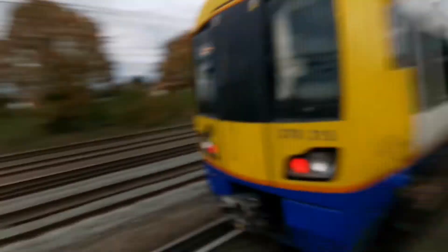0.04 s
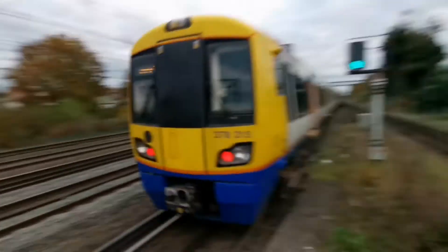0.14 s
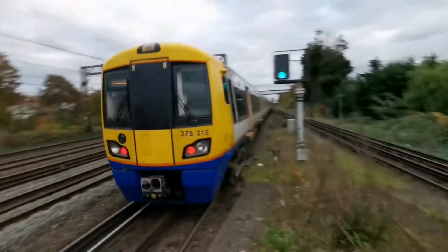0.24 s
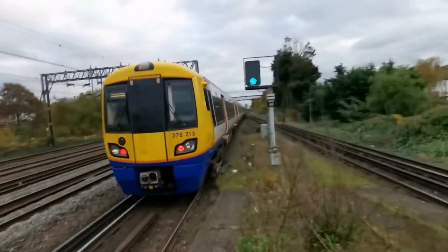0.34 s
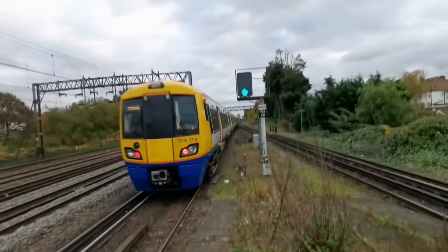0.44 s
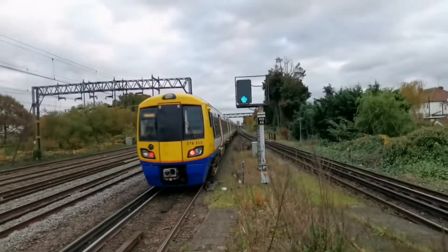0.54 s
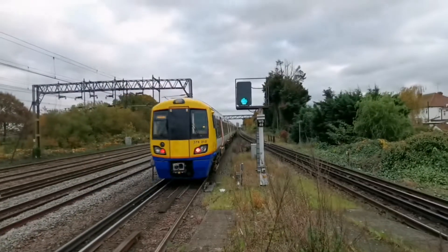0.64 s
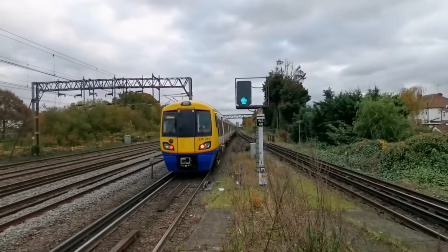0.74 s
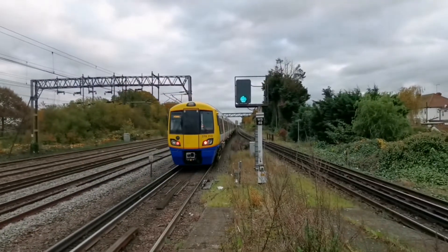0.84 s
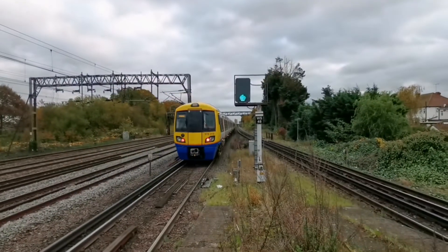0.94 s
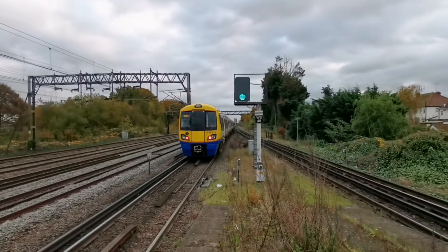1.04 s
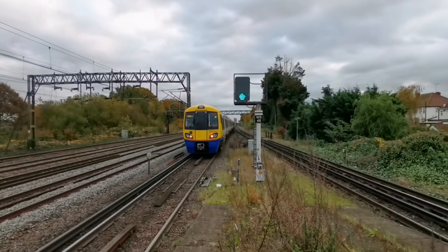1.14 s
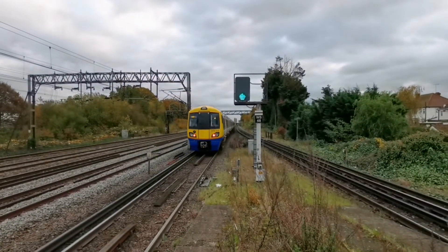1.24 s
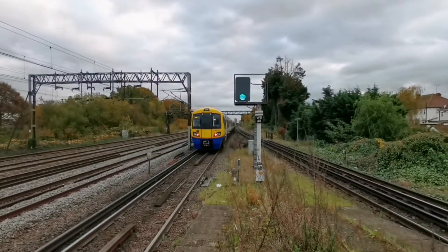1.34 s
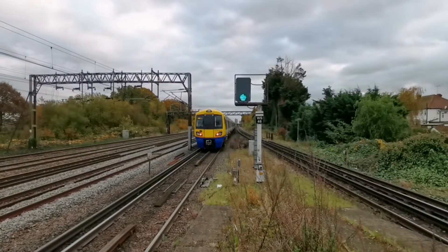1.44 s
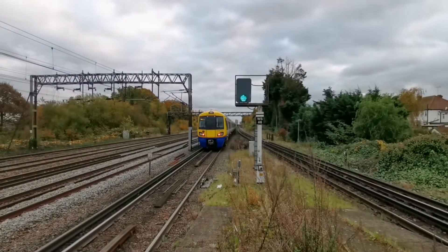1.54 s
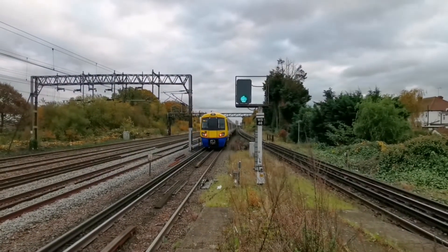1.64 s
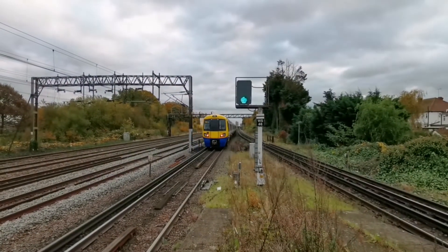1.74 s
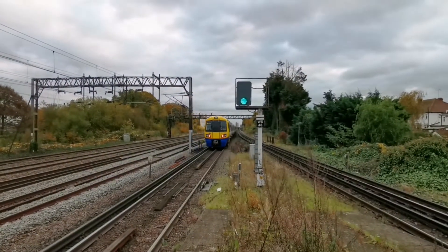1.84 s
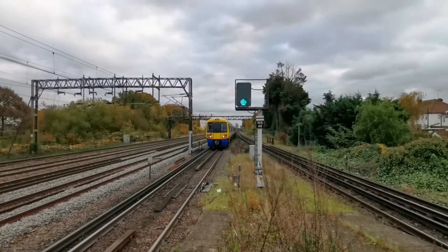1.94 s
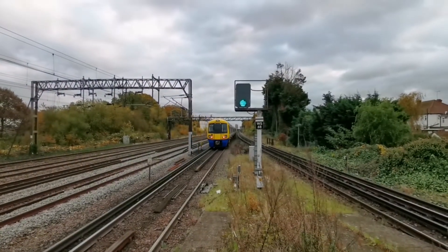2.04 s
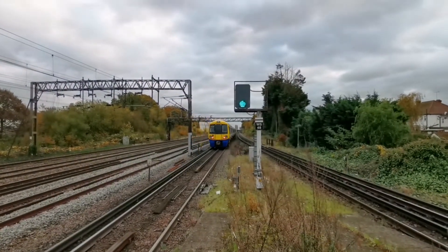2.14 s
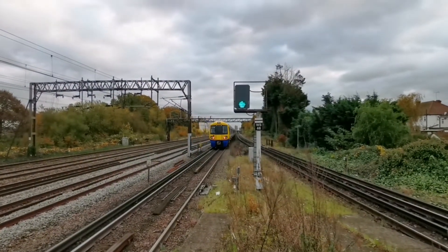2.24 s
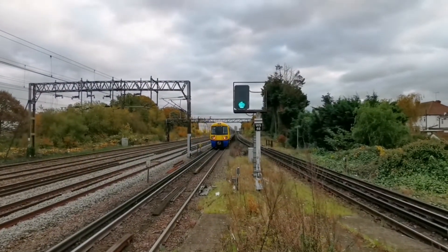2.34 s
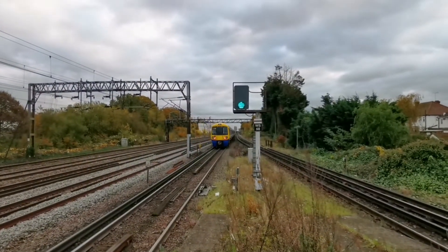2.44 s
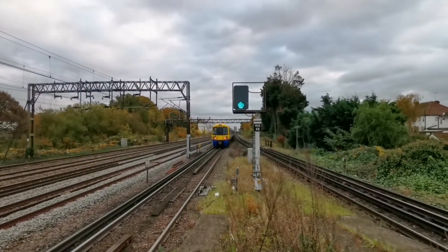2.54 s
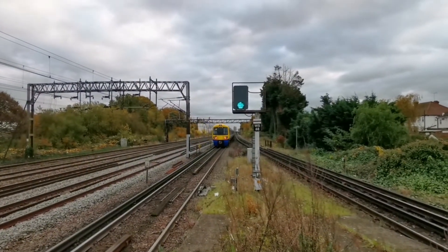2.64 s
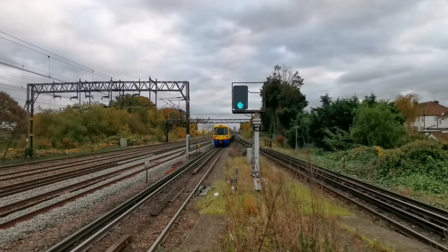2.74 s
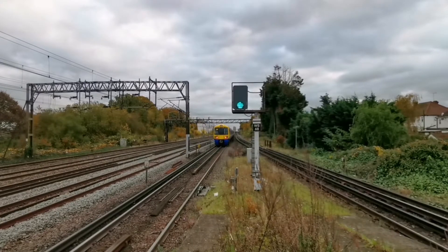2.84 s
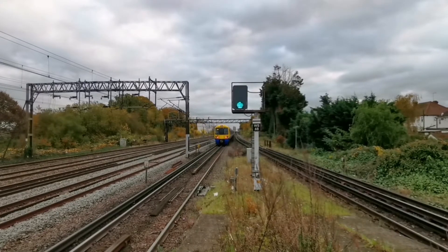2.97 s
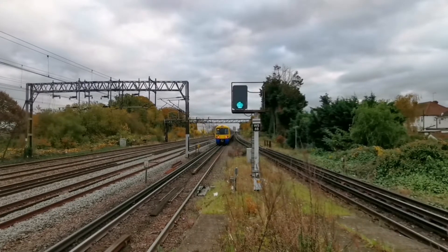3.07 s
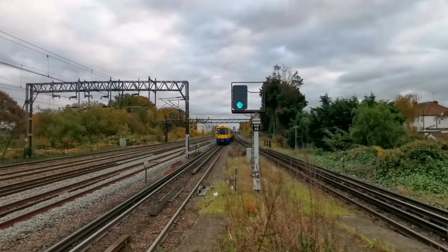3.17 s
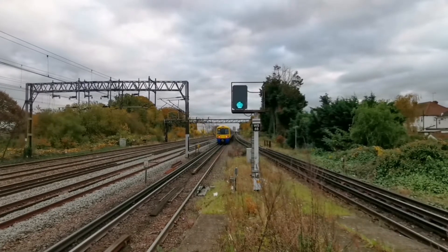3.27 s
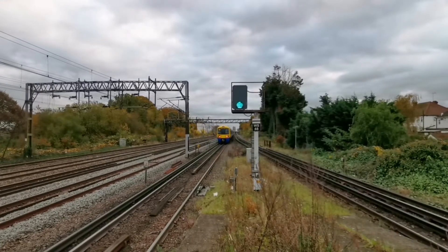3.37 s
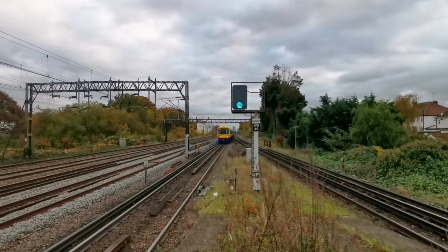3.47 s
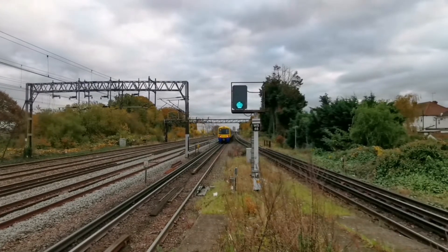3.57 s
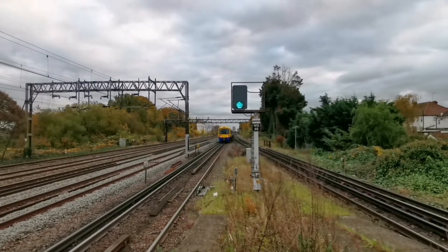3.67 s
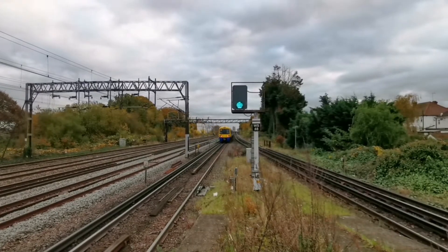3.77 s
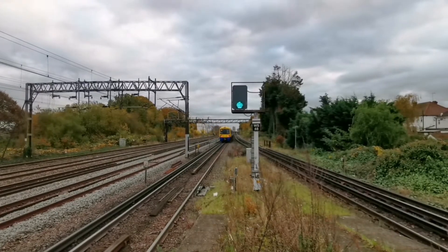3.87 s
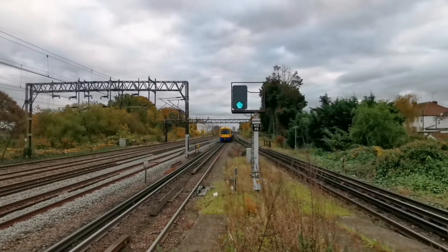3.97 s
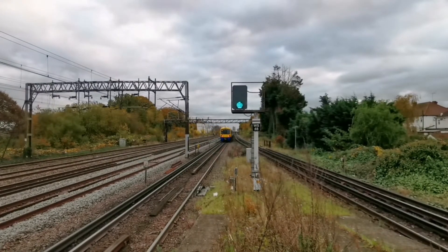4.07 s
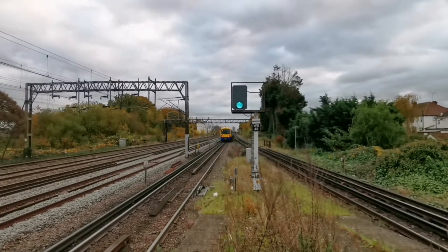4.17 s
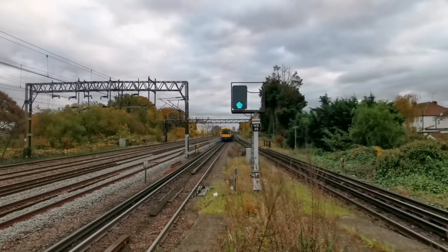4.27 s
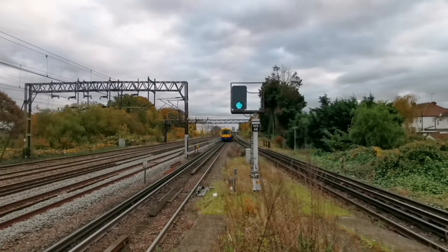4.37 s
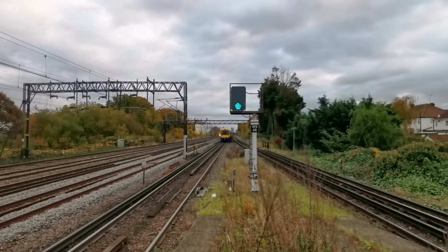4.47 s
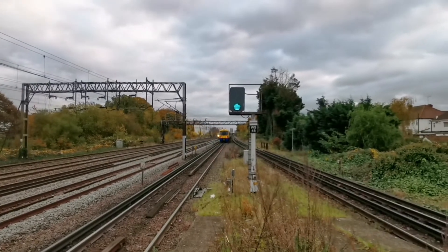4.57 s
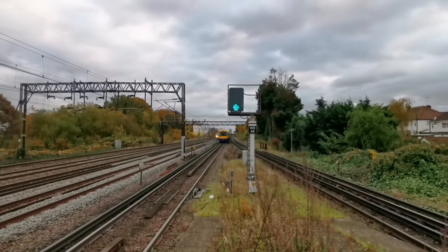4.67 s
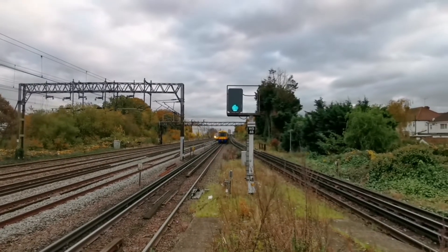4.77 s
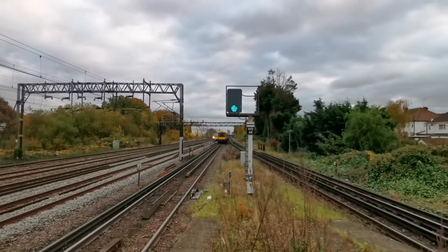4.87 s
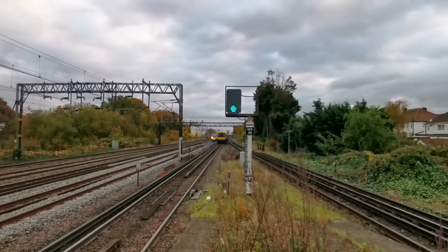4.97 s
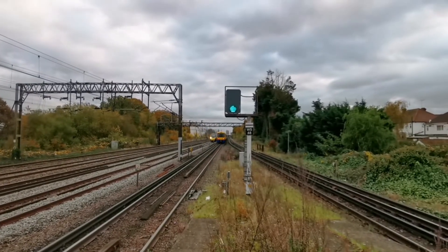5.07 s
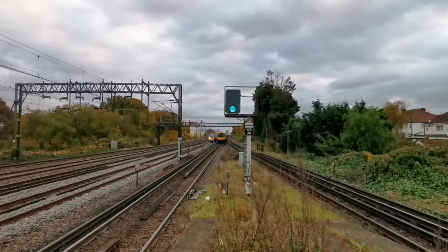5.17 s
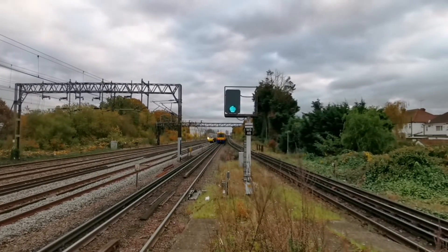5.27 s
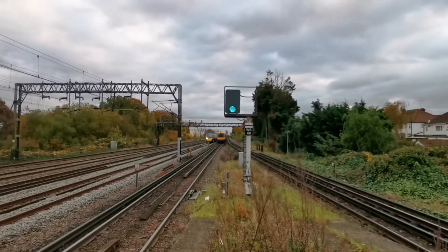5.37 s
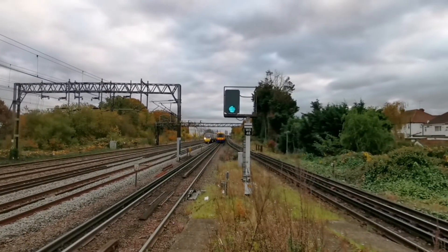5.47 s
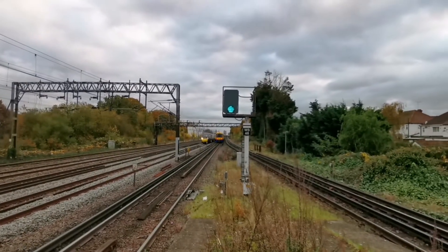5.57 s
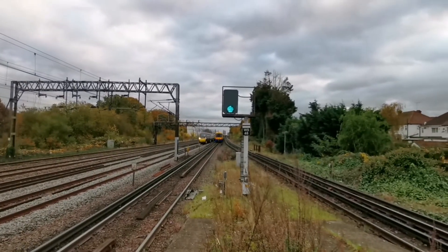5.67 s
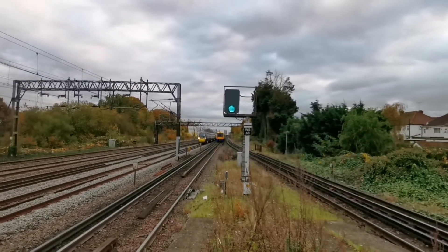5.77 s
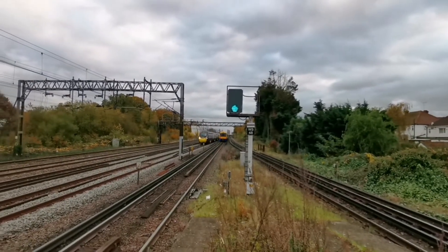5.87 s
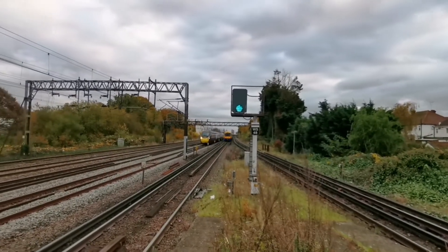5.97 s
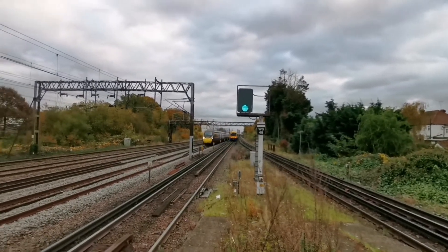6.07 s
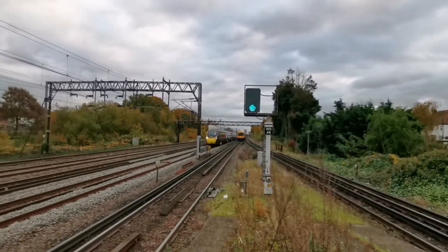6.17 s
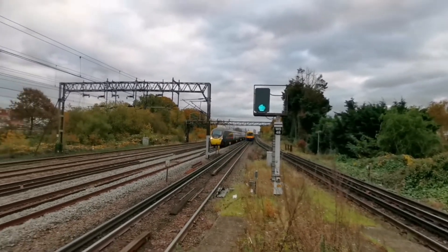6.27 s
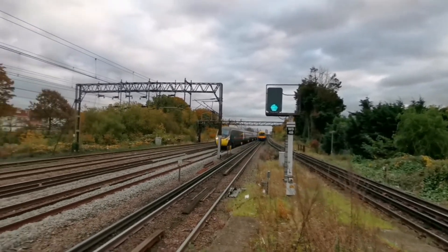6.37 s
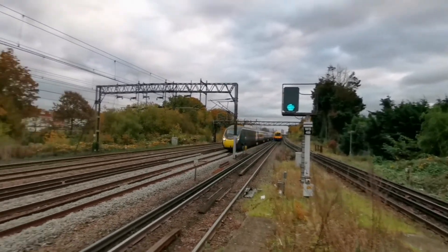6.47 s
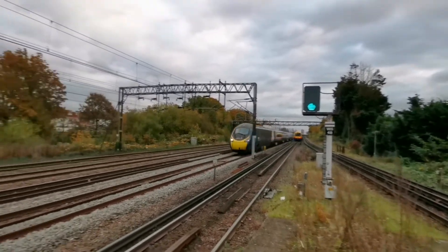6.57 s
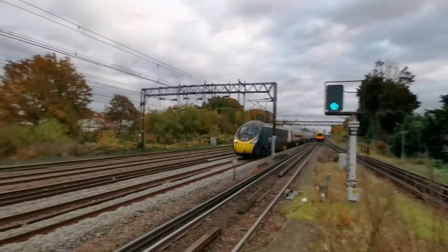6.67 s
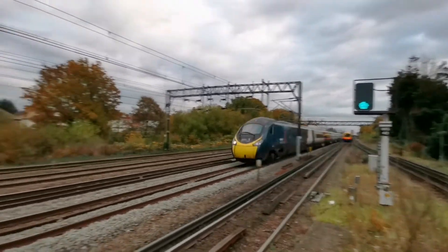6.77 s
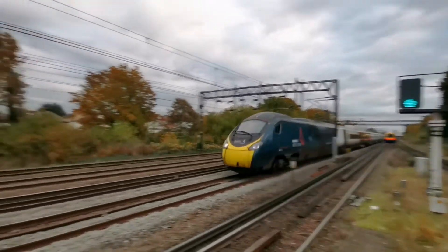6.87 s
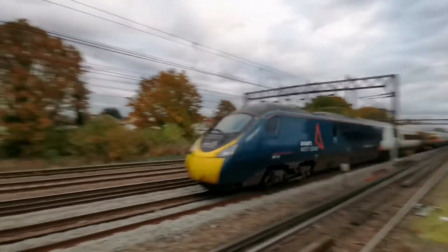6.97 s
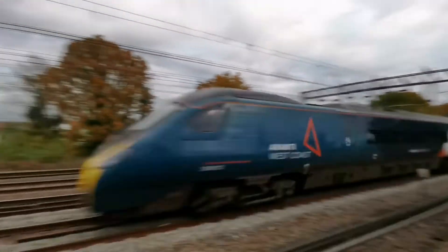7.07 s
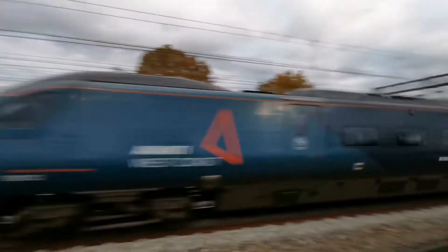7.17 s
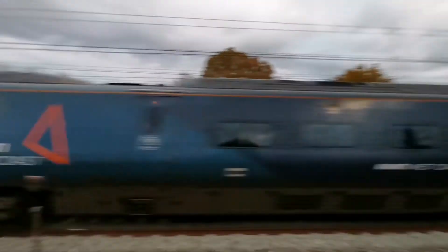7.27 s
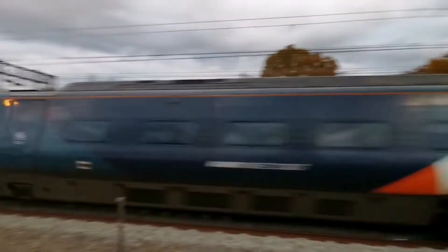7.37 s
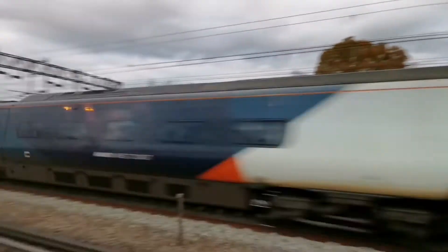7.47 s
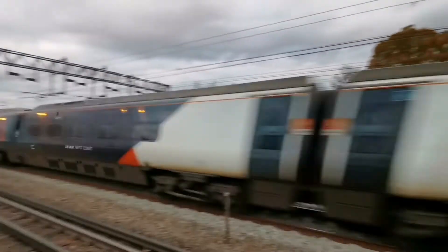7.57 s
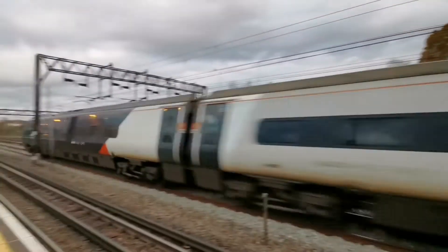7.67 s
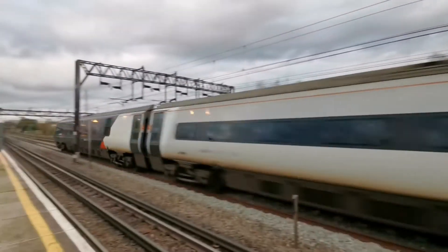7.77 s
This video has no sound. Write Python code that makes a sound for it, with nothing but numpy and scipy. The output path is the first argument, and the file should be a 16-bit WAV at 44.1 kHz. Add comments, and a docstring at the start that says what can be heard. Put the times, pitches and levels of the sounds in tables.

```python
"""First one hears the roar and rumble of a stopping train leaving a platform end, in wind that buffets two
microphones; low thumps, scrapes and wheels clanking over distant rail joints are heard along with it. A fast
train comes up on the far track: the rails hiss, then rumble, rolling roar and gear whines swell, the whines
sliding down as each bogie passes. Roar, wind and hiss are filtered random spectra; whines are tones in narrow
noise; thumps are short low oscillations; joint blows are noise shaped by wheel modes or a broad spectrum."""
import sys
import numpy as np
from scipy import signal
from scipy.fft import rfft, irfft
from scipy.io import wavfile
from scipy.ndimage import uniform_filter1d

SR = 44100
rng = np.random.default_rng(int(sys.argv[2]) if len(sys.argv) > 2 else 0)


def output_pcm(signal):
    """Save a mono or channel-first signal as 16-bit PCM at the path in sys.argv[1].

    Samples are clipped to [-1, 1] before scaling.
    """
    pcm = np.clip(np.atleast_2d(signal).T, -1, 1) * 32767
    wavfile.write(sys.argv[1], SR, np.round(pcm).astype(np.int16))


N = 344862  # samples
HOP = 256  # samples between spectral frames
HZ = np.fft.rfftfreq(4 * HOP, 1 / SR)[:, None]  # bin frequencies
T = np.arange(N // HOP + 5) * HOP / SR  # frame times in s

# Level difference of the microphones, source ahead or abreast: (f/Hz, left-right level/dB)
AHEAD = [(60, -0.5), (99, -0.5), (160, -0.5), (270, -1.5), (450, -5.5), (740, -3.5), (1220, -6.5),
         (2010, -10.0), (3330, -13.0), (5500, -11.0), (9080, -1.5), (15000, -7.0)]
ABREAST = [(60, 0.0), (99, -0.5), (160, 0.0), (270, 0.0), (450, -2.0), (740, -2.5), (1220, -1.5),
           (2010, -4.0), (3330, -7.0), (5500, -5.5), (9080, 7.5), (15000, -2.5)]
# Correlation of the microphones, near and far track: (f/Hz, left-right likeness from -1 to 1)
SAME_NEAR = [(60, .95), (340, .93), (690, .75), (1030, .45), (1500, 0), (2000, .1), (2600, .55),
             (3200, -.15), (4000, .15), (5500, 0)]
SAME_FAR = [(60, .92), (330, .86), (520, .75), (860, .68), (1200, .05), (1550, -.45), (1900, -.15),
            (2400, .45), (2900, .1), (3300, -.35), (4000, .35), (5200, -.15), (7000, .05)]

# Leaving train, relative spectra of the roar nearby and far off, and of the rumble: (f/Hz, level/dB per Hz)
LEAVING_NEAR = [(150, -43), (250, -8.5), (312, 1.5), (360, -7.5), (442, -4), (769, -12.5), (1140, -9.5),
                (1470, -15), (2020, -5.5), (2370, -9.5), (2910, -8.5), (3410, -17.5), (4750, -16),
                (7760, -34), (11000, -36.5), (14300, -64), (22000, -120)]
LEAVING_FAR = [(210, -0.5), (350, -3), (474, -13.5), (540, -4.5), (752, -1.5), (1460, -11.5), (1950, -6.5),
               (2830, -4.5), (3320, -15.5), (4630, -19), (6360, -36), (6930, -31.5), (7450, -41),
               (10200, -37), (11000, -41), (14300, -78), (22000, -120)]
LEAVING_LOW = [(12, -45), (20, -1), (48, -3.5), (92, 0), (172, -2.5), (241, -13.5), (312, -17),
               (600, -27.5), (780, -64), (1320, -120)]
# Brief swells of its roar: (peak t/s, added level/dB, 1/e half-length/s)
SWELLS = [(.6, 2, .3), (1.75, 3, 0.25), (3.058, 2.5, .35), (3.987, 3.5, 0.081), (4.5, 3.5, 0.35)]
# Roar level once risen, before spreading; time in which distance doubles; loss per doubling
ROAR_DB, DOUBLE_S, SPREAD_DB = -28, 0.34, 5
ONSET_DB, ONSET_S = 8.5, 0.068  # how much weaker the roar starts; time constant of its quick rise
RUMBLE_DB, RUMBLE_HOLD_S, RUMBLE_FADE_DB_PER_S = -33, 0.72, 12

# Relative spectrum of wind turbulence before brightening: (f/Hz, level/dB per Hz)
WIND_COLOUR = [(8.8, -33), (15, -7), (54, 8.5), (141, -3.5), (194, -5.5), (499, -27), (547, -29),
               (600, -23.5), (780, -35), (1320, -120)]
# Gusts: (peak t/s, level/dB, 1/e half-length/s, left-right level/dB before widening,
# treble slope/dB per octave before the common slope is added)
GUSTS = [(2.04, -36.5, .05, 0, 8), (2.13, -34, 0.036, -12, -20), (2.2, -34, .05, -2, 0),
         (2.27, -35, 0.043, -11, -20), (2.41, -35, 0.06, 0, -15), (2.557, -31, 0.065, -15, -15),
         (2.746, -32, 0.17, -3, -12), (2.98, -40, 0.14, -3, -14), (3.202, -31, 0.053, -7, -2),
         (3.308, -32.5, .05, -4, -14), (3.4, -26, 0.054, -9, -7), (3.46, -28, .04, 2, -17),
         (3.516, -28, .025, -12, -2.5), (3.62, -33.5, 0.12, -5, -11.5), (3.81, -30, 0.15, 8.5, -15),
         (4.04, -35, 0.088, 11, -12), (4.22, -34, 0.13, -0.5, -8), (4.554, -39, 0.069, -3, -22),
         (4.695, -34.5, 0.039, 9, -18), (5.43, -38, 0.044, -12, -11.5)]
BREEZE_DB = -58.5  # steady wind under the gusts

# Rail hiss, faint after the first train, then ahead of the fast one: (t/s, level/dB)
RAILS = [(0.0, -54), (0.25, -57), (0.63, -64), (3.63, -66.5), (5.75, -55), (6.45, -43), (6.8, -36),
         (7.0, -40.5), (7.82, -42)]
# Its relative spectrum: (f/Hz, level/dB per Hz)
RAIL_HISS = [(5290, -57), (9000, -13), (9640, -3), (10900, -20), (11100, 11.5), (11700, 3), (12900, 10),
             (14300, 1.5), (15600, 9)]
# Thin tones in the rails: (f/Hz, pole width/Hz, level/dB against the capped hiss level)
RAIL_TONES = [(11700, 40, -13.5), (12650, 60, -15)]

# Single low thumps: (t/s, level/dB, f/Hz, left-right level/dB)
THUMPS = [(0.099, -19.5, 77, -3), (0.431, -9, 176, -2.5), (0.592, -20.5, 182, -3.0),
          (0.649, -21.5, 158, -2), (0.828, -23, 120, -3.5), (1.203, -28, 112, -2.0), (1.567, -28, 197, -1),
          (1.979, -27.5, 172, 0), (2.023, -25, 200, -1.5), (2.17, -21.5, 181, 1), (2.04, -27, 310, -1),
          (2.206, -24, 124, 2), (2.218, -24, 330, -1), (2.793, -24, 194, 1.5), (2.965, -29.5, 197, -2.0),
          (3.185, -24.5, 163, -11.0), (3.388, -23, 148, -15), (3.508, -22.5, 131, -19),
          (4.291, -19, 170, -0.5)]
# Short scrapes: (start t/s, end t/s, level/dB, resonance f/Hz, pole width/Hz)
SCRAPES = [(3.915, 4.05, -49.5, 4640, 720), (3.76, 3.9, -48.5, 2870, 300), (3.92, 4.04, -40.5, 2740, 400),
           (4.595, 4.63, -52, 3900, 600), (.17, .25, -49, 12000, 1500), (.17, .24, -46, 9200, 1000),
           (.17, 0.254, -32, 2950, 350), (.12, .4, -38.5, 1170, 230), (.12, .18, -36, 2100, 150),
           (6.885, 6.91, -38, 5300, 800)]

# Wheels ringing at a joint: (t/s, level/dB, decay by 60 dB/s)
CLINKS = [(1.967, -39, 0.076), (2.151, -26.5, 0.03), (3.241, -42, 0.07), (4.01, -36, 0.045),
          (4.177, -25, 0.035)]
# Wheel modes: (f/Hz, pole width/Hz, level/dB)
WHEEL_MODES = [(1076, 176, 7.5), (1750, 260, 0.5), (2160, 300, -13), (2730, 150, -17)]
# Wheels dropping at a joint: (t/s, level/dB, decay by 60 dB/s, treble slope/dB per octave above 700 Hz)
CLUNKS = [(0.833, -25, 0.036, 1), (2.03, -22.5, 0.038, -1), (2.208, -17, 0.049, -1),
          (2.966, -30, 0.037, 3.5), (4.133, -27, 0.14, -0.5), (4.305, -11, 0.043, -1)]
# Relative spectrum of a drop: (f/Hz, level/dB per Hz)
CLUNK_COLOUR = [(88, -35), (150, 0), (330, -1), (509, -10.5), (838, 5), (1020, -7.5), (2100, -8),
                (2460, -21), (2710, -15), (4050, -21.5), (7000, -43), (9100, -83), (15400, -120)]

# Motor and gear tones: (head-on f/Hz, passing t/s, pole width/Hz, half the pitch fall as share of f,
# level/dB, time held before passing/s, rise/dB per s, fade/dB per s, tone amplitude against noise of rms 1)
WHINES = [(764, 7.31, 25, .053, -27, .44, 93, 17, 0.77), (821, 7.26, 40, .03, -28, .1, 80, 88, .4),
          (759.6, 6.15, 38, .001, -37.5, .15, 15, 60, 0.37),
          (99.9, 6.1, 25, .001, -32.5, .15, 90, 60, 0.64), (1507, 7.3, 19.5, 0.011, -28.5, 0.68, 93, 92, 1),
          (2290, 7.25, 28, .015, -28, .5, 40.5, 152, 0.79), (1855, 7.2, 26, .02, -29, .01, 19, 64, .3),
          (3360, 7.12, 87, .01, -31.5, 0.085, 60, 90, .3), (850.5, 7.2, 24, .03, -31.5, .3, 27, 68, .5),
          (2301, 7.33, 61, .075, -22.5, .01, 148.5, 34, .3), (2510, 7.66, 73, .11, -21, .01, 27, 32, 0.33),
          (2384, 7.66, 71, .03, -26, .01, 29, 30.5, .3), (2805, 7.8, 67, 0.018, -24.5, .01, 25, 30, 0.26),
          (190.4, 7.28, 31, .03, -24, .01, 60.5, 84, 0.26),
          (3145, 7.23, 110, 0.0305, -23, .01, 202.5, 170, .3),
          (3990, 7.21, 90, .03, -27.5, 0.0085, 200.5, 152, 0.33),
          (4265, 7.3, 90, .03, -30.5, 0.0096, 198.5, 200, .3),
          (2490, 7.2, 36, 0.016, -34.5, .01, 17, 60, .3), (4210, 7.57, 100, .02, -31.5, .01, 150.5, 60, .3)]
# Surges of the leading car's low drone: (t/s, level/dB)
SURGES = [(5.1, -35), (5.28, -29.5), (5.42, -29), (5.68, -29), (6.03, -27), (6.3, -25), (6.45, -25.5),
          (6.86, -18.5), (7.03, -20)]
DRONE_HZ, DRONE_WIDTH_HZ = 64, 29
SURGE_RISE_DB_PER_S, SURGE_FADE_DB_PER_S = 218, 76

# Fast train: (t/s, rolling level/dB, rumble level/dB)
FAST = [(4.4, -57, -41.5), (5.03, -46.5, -40.5), (5.65, -38.5, -39.5), (6.0, -33.5, -31.5),
        (6.62, -27, -28.5), (7.1, -18.5, -22.5), (7.31, -18.5, -22), (7.64, -18, -26), (7.82, -20.5, -29.5)]
# Relative spectra of its roar, ahead and abreast: (f/Hz, level/dB per Hz)
FAST_AHEAD = [(210, -34), (350, -17.5), (481, -16.5), (763, -3.5), (1300, -11.5), (1460, -4.5), (1690, -9),
              (2320, -1.5), (2680, -6.5), (3730, -15.5), (4180, -16), (6180, -33), (6640, -30), (7780, -38),
              (11000, -29), (14300, -66), (22000, -120)]
FAST_ABREAST = [(210, -48), (350, -9), (532, -17), (614, -13.5), (680, -3.5), (933, -10), (1230, -16),
                (1760, -7.5), (1920, -7.5), (2320, 4), (2640, -3), (3780, -15.5), (4120, -14), (5350, -22),
                (11000, -30.5), (14300, -37.5), (22000, -120)]
# Relative spectra of its rumble, far and near: (f/Hz, level/dB per Hz)
FAST_LOW_FAR = [(12, -42), (20, 6.5), (65, -2), (109, -17), (147, -20.5), (273, -26.5), (304, -23.5),
                (414, -60), (500, -59), (650, -60), (1100, -120)]
FAST_LOW_NEAR = [(12, -33), (20, 1), (71, 5), (120, -8), (145, -11.5), (185, -5), (229, -10.5), (312, -8),
                 (400, -15.5), (500, -25), (650, -39), (1100, -120)]

EDGE_HZ = 15760  # upper band limit


def gain_of(db):
    """Level and amplitude: 20 dB is a factor of ten."""
    return 10 ** (np.asarray(db) / 20)


def evened(x):
    """Normalisation: the mean power becomes 1."""
    return x / np.sqrt(np.mean(x ** 2) + 1e-20)


def read(points, hz=HZ):
    """Interpolation of a spectrum along a logarithmic frequency axis."""
    f, value = np.transpose(points)
    return np.interp(np.log(hz + 1), np.log(f + 1), value)


def blend(start, end, share):
    """Linear mixing of two spectra in dB, from start (share 0) to end (share 1)."""
    share = np.clip(share, 0, 1)
    return read(start) * (1 - share) + read(end) * share


def bumps(s, length):
    """Gaussian envelopes at frame times, one row each."""
    return np.exp(-((T - s[:, None]) / length[:, None]) ** 2)


def noise(colour_db, level_db, pan_db, same, patchy_db, flicker_db):
    """Partial coherence: two random spectra share a part; level_db sets their mid before fluctuation."""
    a, b, c, d, patches = rng.standard_normal((len(T), len(HZ), 5)).T
    patches = uniform_filter1d(patches, size=9, axis=0)
    patches = evened(uniform_filter1d(patches, size=12, axis=1))
    flicker = evened(uniform_filter1d(rng.standard_normal(len(T)), size=6))
    shape = gain_of(colour_db) * np.ones(len(T))
    shape = shape / np.sqrt((shape ** 2).mean(0))
    left, right = gain_of(pan_db / 2), gain_of(-pan_db / 2)
    same = np.clip(same, -1, 1)
    mid = np.sqrt(left ** 2 + right ** 2 + 2 * same * left * right) / 2
    first, second = a + 1j * b, c + 1j * d
    z = np.array([left * first, right * (same * first + np.sqrt(1 - same ** 2) * second)])
    z *= shape / mid * gain_of(level_db + patchy_db * patches + flicker_db * flicker)
    return signal.istft(z, nperseg=4 * HOP, noverlap=3 * HOP)[1][:, :N] / np.sqrt(HOP)


def resonate(x, hz, width):
    """Heterodyne filtering: shift hz to zero, smooth with two poles, shift back."""
    turn = np.exp(2j * np.pi * np.cumsum(hz * np.ones(len(x))) / SR)
    pole = np.exp(-np.pi * width / SR)
    smooth = signal.lfilter([1], np.poly([pole, pole]), x / turn)
    return evened((turn * smooth).real)


def ports(x, hz):
    """Level difference between two microphones that receive one source ahead at pitch hz."""
    pan_db = read(AHEAD, hz)
    return gain_of(pan_db / 2) * x, gain_of(-pan_db / 2) * x


def place(mix, s, left, right):
    """Superposition: a stereo sound is added to mix from s seconds on."""
    out, at = np.zeros((2, N)), max(round(s * SR), 0)
    out[:, at:at + len(left)] = np.array([left, right])[:, :N - at]
    return mix + out


def leaving():
    """Spreading loss: after a quick rise the stopping train's roar weakens and dulls; its rumble dies faster."""
    colour_db = blend(LEAVING_NEAR, LEAVING_FAR, 1 - np.exp(-(T / 1.27) ** 2))
    s, swell_db, length = np.transpose(SWELLS)
    level_db = ROAR_DB - SPREAD_DB * np.log2(1 + T / DOUBLE_S)
    level_db = level_db - ONSET_DB * np.exp(-T / ONSET_S) + swell_db @ bumps(s, length)
    roar = noise(colour_db, level_db, read(AHEAD) - 1.2, read(SAME_NEAR), patchy_db=1.15, flicker_db=0.73)
    rumble_db = RUMBLE_DB - RUMBLE_FADE_DB_PER_S * np.maximum(T - RUMBLE_HOLD_S, 0)
    return roar + noise(read(LEAVING_LOW), rumble_db, -2.2, 0.96, patchy_db=0.8, flicker_db=3.0)


def wind():
    """Turbulent pressure at the ports, weakly correlated; gusts weigh on side and brightness by power."""
    s, db, length, pan_db, bright_db = np.transpose(GUSTS)
    power = gain_of(2 * db)[:, None] * bumps(s, length) ** 2
    total = power.sum(0) + gain_of(2 * BREEZE_DB)
    slope_db = bright_db @ power / total + 9.5  # dB per octave
    octaves = np.clip(np.log2(HZ / 90 + 1e-3), 0, 1.3)  # above 90 Hz
    colour_db = read(WIND_COLOUR) + slope_db * octaves
    side_db = 1.1 * pan_db @ power / total
    return noise(colour_db, 10 * np.log10(total), side_db, 0.41, patchy_db=1.5, flicker_db=.8)


def rails():
    """Structure-borne sound: high hiss and thin tones are carried along the rails."""
    s, db = np.transpose(RAILS)
    level_db = np.interp(T, s, db, -120, -120)
    out = noise(read(RAIL_HISS), level_db, read(AHEAD), -0.14, patchy_db=1.8, flicker_db=.8)
    capped_db = np.minimum(level_db, -49)  # the tones stop growing early
    tone_db = np.interp(np.arange(N) / SR, T, capped_db)
    for hz, width, db in RAIL_TONES:
        tone = resonate(rng.standard_normal(N), hz, width)
        out += np.array(ports(gain_of(tone_db + db) * tone, hz))
    return out


def thumps():
    """Transient oscillation: a few low cycles swell and die."""
    out = np.zeros((2, N))
    for s, db, hz, pan_db in THUMPS:
        turns = np.arange(0, 5, hz / SR)
        u = turns / 0.81  # the envelope peaks after 0.81 cycle
        x = gain_of(db) * u * np.exp(1 - u) * np.sin(2 * np.pi * turns)
        out = place(out, s, gain_of(pan_db / 2) * x, gain_of(-pan_db / 2) * x)
    return out


def scrapes():
    """Resonance: brief bands of hiss, each about one frequency."""
    out = np.zeros((2, N))
    for start, end, db, hz, width in SCRAPES:
        size = round((end - start) * SR)
        sides = ports(gain_of(db) * signal.windows.tukey(size, .4), hz)
        # independent noise at each microphone
        left, right = (side * resonate(rng.standard_normal(size), hz, width) for side in sides)
        out = place(out, start, left, right)
    return out


def blow(db, t60, lead, rise):
    """Impact and reverberation: a wheel touches, strikes 9 ms later, bounces; the surroundings ring on."""
    t = np.arange(8192) / SR
    hit = (1 - np.exp(-t / rise)) * gain_of(db - 60 * t / t60)
    tail = (1 - np.exp(-t / 0.01)) * gain_of(db - 15 - 60 * t / 0.26)
    return lead * hit + np.roll(hit + tail, 400) + 0.21 * np.roll(hit, 1300)


def clinks():
    """Modal vibration: a joint sets the wheel modes ringing."""
    out = np.zeros((2, N))
    for s, db, t60 in CLINKS:
        shape = blow(db, t60, lead=.07, rise=0.0038)
        ring = np.zeros((2, len(shape)))
        for hz, width, mode_db in WHEEL_MODES:
            mode = resonate(rng.standard_normal(len(shape)), hz, width)
            ring += np.array(ports(gain_of(mode_db) * mode, hz))
        out = place(out, s - .01, *(shape * ring))
    return out


def clunks():
    """Broadband impact: a wheel dropping at a joint gives a rattling blow."""
    out = np.zeros((2, N))
    for s, db, t60, tilt_db in CLUNKS:
        shape = blow(db, t60, lead=0.36, rise=0.0018)
        hz = np.fft.rfftfreq(len(shape), 1 / SR)
        colour_db = read(CLUNK_COLOUR, hz) + tilt_db * np.log2(np.maximum(hz, 700) / 700)
        a, b = rng.standard_normal((2, len(shape)))
        sources = a, 0.74 * a + 0.42 * b  # partly alike
        sides = ports(gain_of(colour_db), hz)
        rattle = [irfft(rfft(x) * side) for x, side in zip(sources, sides)]
        out = place(out, s - .01, *(shape * evened(np.array(rattle))))
    return out


def joints():
    """Superposition of ringing and dropping wheels at the rail joints."""
    return clinks() + clunks()


def doppler(t, hz, passing, fall):
    """Doppler effect: pitch falls with the closing speed as a bogie passes."""
    closing = (passing - t) / np.hypot(t - passing, .06)  # +1 head-on, -1 going away
    return hz * (1 - fall * (1 - closing))


def waver(pitch_hz, level_db, width, clean, hiss):
    """Narrow-band noise, partly coherent between the ports, around a tone of amplitude clean."""
    tone = clean * np.cos(2 * np.pi * np.cumsum(pitch_hz) / SR)
    one, other = (resonate(x, pitch_hz, width) for x in hiss)
    left, right = ports(gain_of(level_db), pitch_hz[0])
    same = read(SAME_FAR, pitch_hz[0])
    second = np.sign(same) * tone + same * one + np.sqrt(1 - same ** 2) * other
    return np.array([left * evened(tone + one), right * evened(second)])


def whines():
    """Doppler shift of motor and gear tones that rise, hold and fade; a low drone comes in surges."""
    start = 4 * SR
    t = np.arange(start, N) / SR
    out = np.zeros((2, len(t)))
    for hz, passing, width, fall, db, held, rise, fade, clean in WHINES:
        slope_db = np.maximum(rise * (passing - held - t), fade * (t - passing))
        level_db = db - np.maximum(slope_db, 0)
        on = level_db > -70  # leave out the faintest part
        pitch_hz = doppler(t[on], hz, passing, fall)
        hiss = rng.standard_normal((2, len(t)))[:, on]
        out[:, on] += waver(pitch_hz, level_db[on], width, clean, hiss)
    surges_db = [db - np.maximum(SURGE_RISE_DB_PER_S * (s - t), SURGE_FADE_DB_PER_S * (t - s))
                 for s, db in SURGES]
    drone_db = np.max(surges_db, axis=0)
    hiss = rng.standard_normal((2, len(t)))
    out += waver(DRONE_HZ + 0 * t, drone_db, DRONE_WIDTH_HZ, 1.0, hiss)
    return place(0, start / SR, *out)


def fast():
    """Rolling noise: the roar changes colour and swings left as the train draws abreast; rumble fills out."""
    abreast = (T - 6.9) / .45
    s, roll_db, rumble_db = np.transpose(FAST)
    colour_db, pan_db = blend(FAST_AHEAD, FAST_ABREAST, abreast), blend(AHEAD, ABREAST, abreast)
    roll_db, rumble_db = np.interp(T, s, roll_db, -120), np.interp(T, s, rumble_db, -120)
    roar = noise(colour_db, roll_db, pan_db, read(SAME_FAR), patchy_db=1.1, flicker_db=.35)
    low_db = blend(FAST_LOW_FAR, FAST_LOW_NEAR, (T - 6.05) / 0.56)
    same = .97 - 0.098 * np.clip(abreast, 0, 1)
    return roar + noise(low_db, rumble_db, -.3, same, patchy_db=0.8, flicker_db=1.5)


def scene():
    """Linear superposition of both trains, the track and the wind."""
    return leaving() + wind() + rails() + thumps() + scrapes() + joints() + whines() + fast()


def record(dry):
    """Saturation of the highest peaks, then low-pass filtering at the band limit."""
    knee, room = .6, .36  # amplitude where clipping starts; most that can be added above it
    over = np.maximum(abs(dry) - knee, 0)
    soft = dry - np.sign(dry) * (over - room * np.tanh(over / room))
    lowpass = signal.firwin(4095, EDGE_HZ, window=("kaiser", 11), fs=SR)
    return signal.oaconvolve(soft, lowpass[None], "same")


dry = scene()
out = record(dry)
output_pcm(out)
```